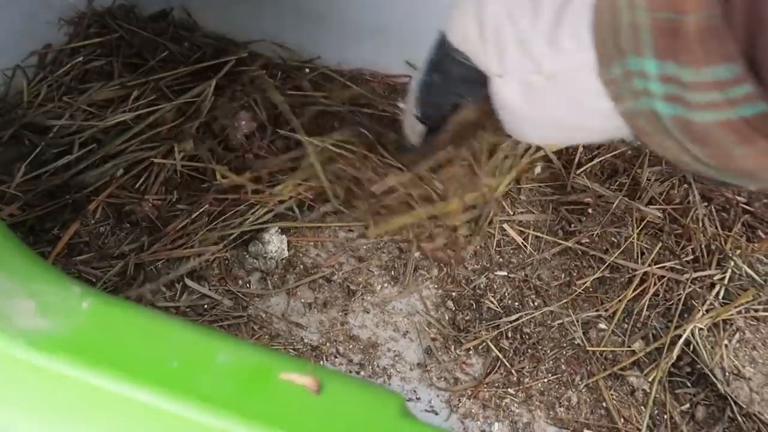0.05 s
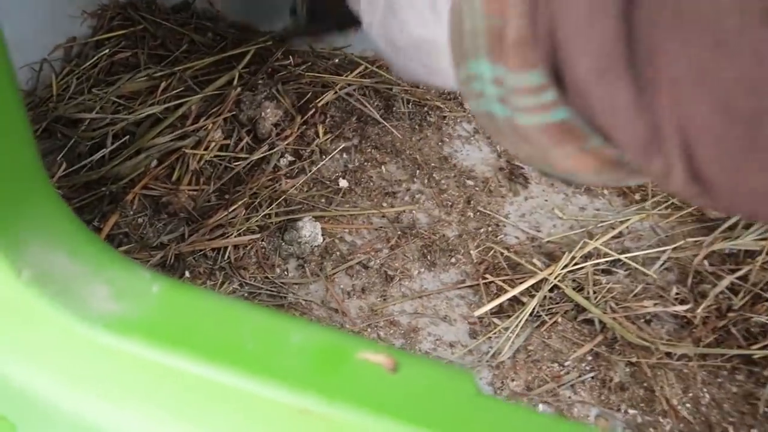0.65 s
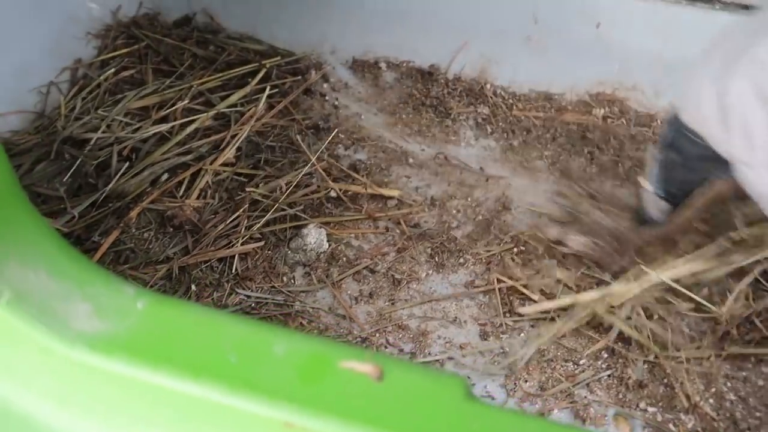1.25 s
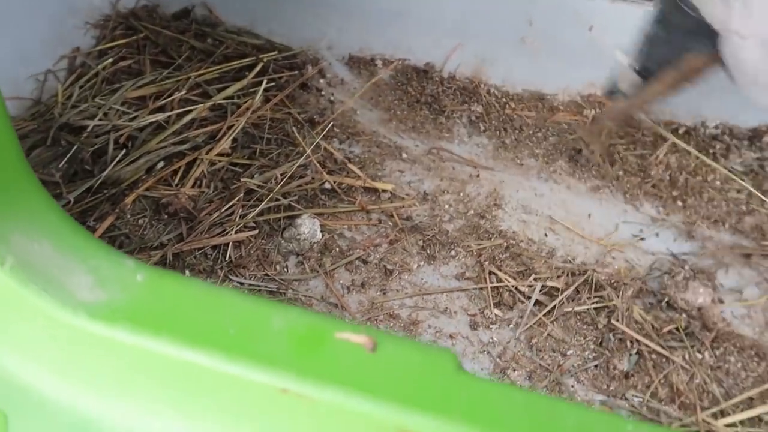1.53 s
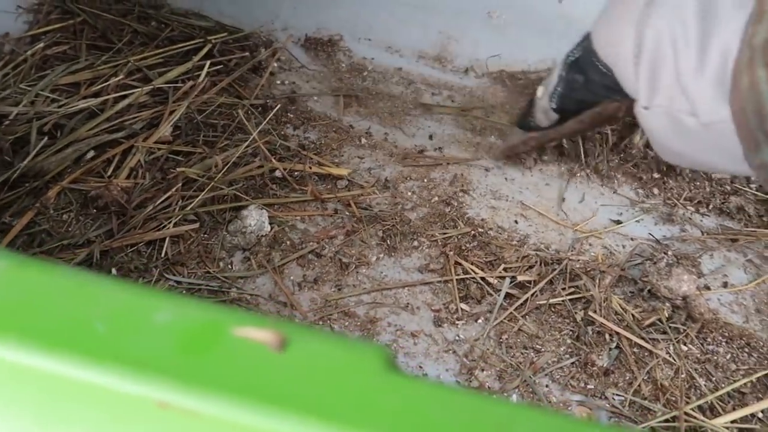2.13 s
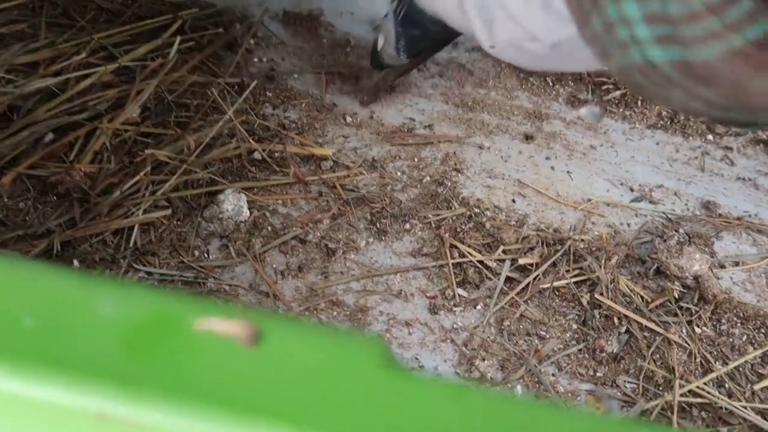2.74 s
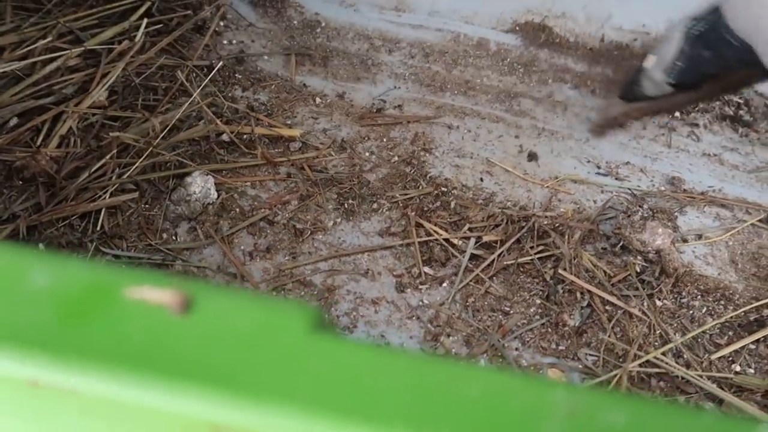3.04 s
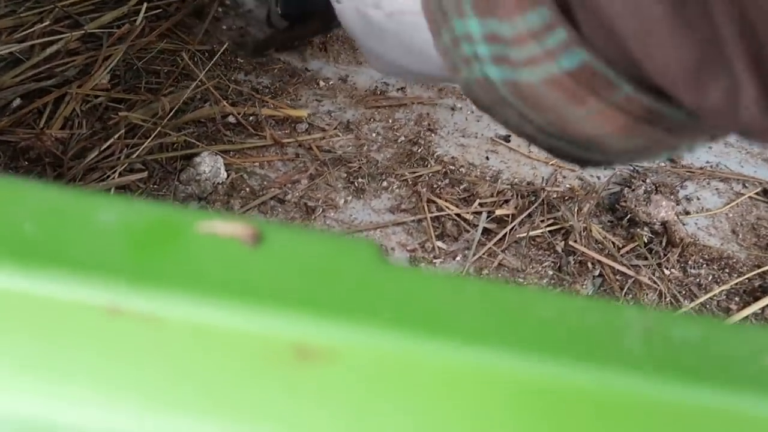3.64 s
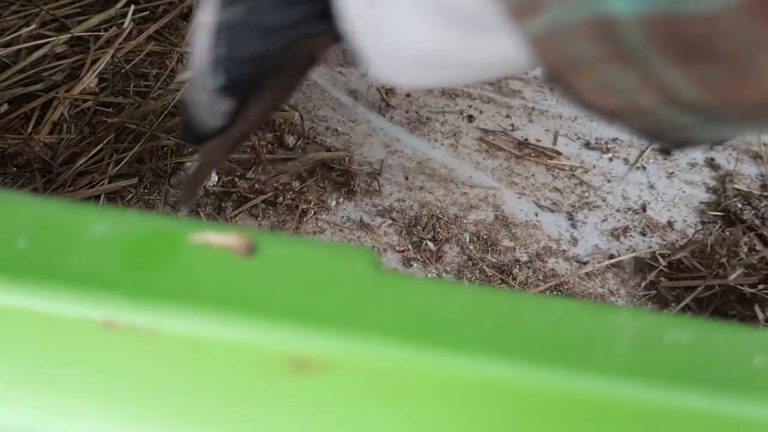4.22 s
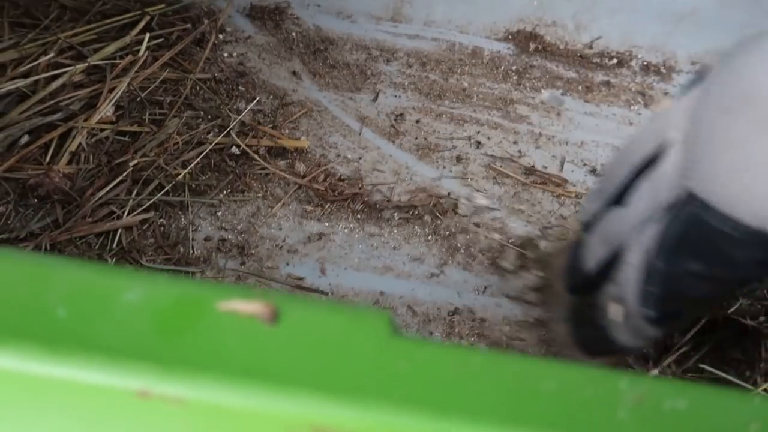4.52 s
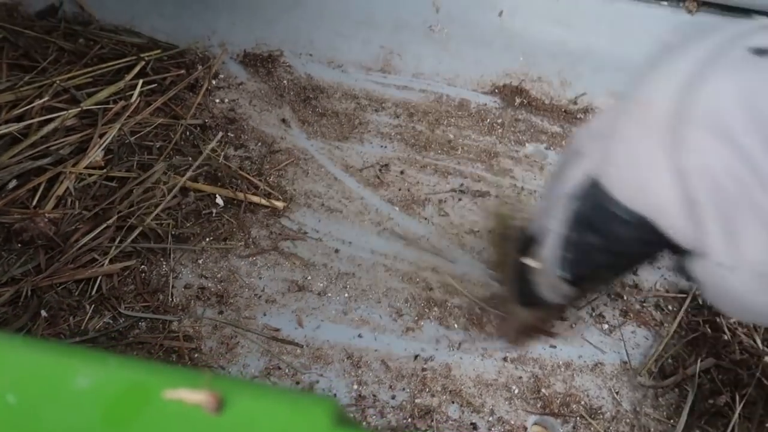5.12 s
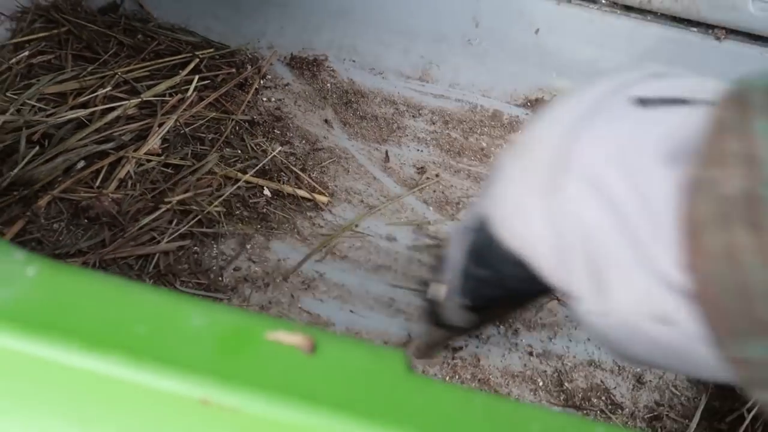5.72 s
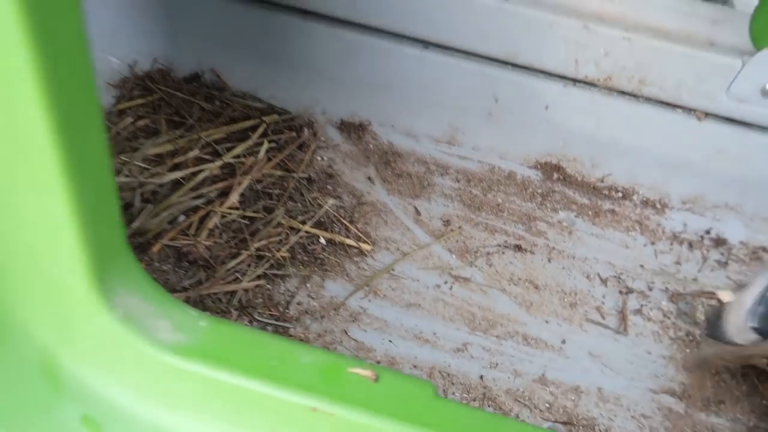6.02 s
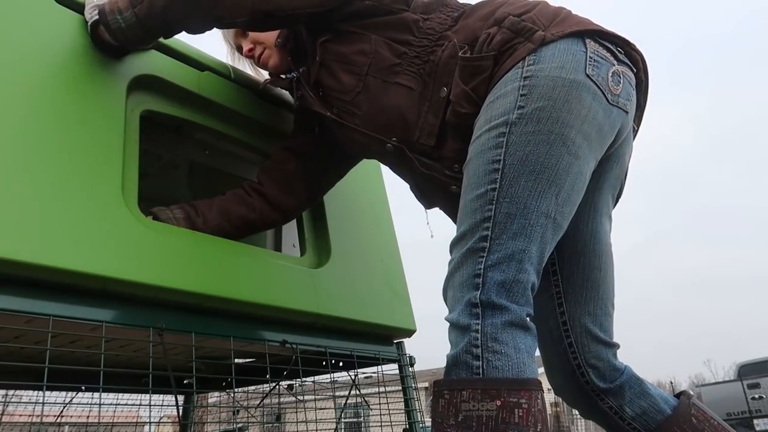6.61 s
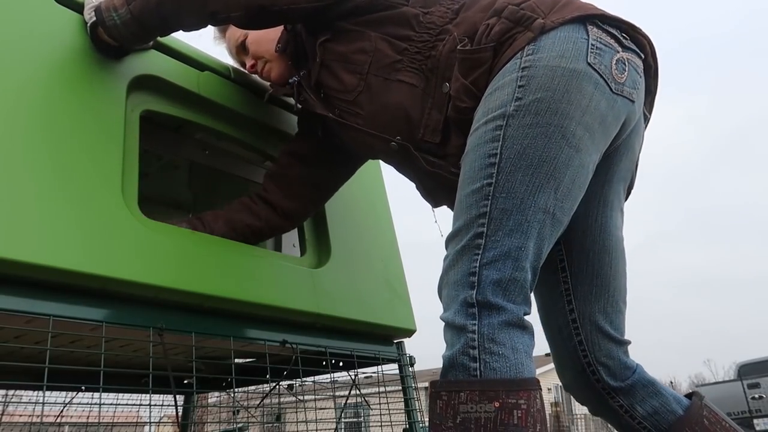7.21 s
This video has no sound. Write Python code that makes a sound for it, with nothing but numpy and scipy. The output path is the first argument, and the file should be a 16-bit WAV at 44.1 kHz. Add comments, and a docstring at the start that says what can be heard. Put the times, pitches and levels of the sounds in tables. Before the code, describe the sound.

Close, gritty scrapes come in a steady run as a blade pushes old straw bedding across the floor of a plastic coop. The hollow shell drums under each stroke and thumps when the blade hits the wall, while loose straw rustles in the gaps. Past the middle, a faint rooster and a few thin bird chirps sound in the quiet outdoor air. The scraping turns softer near the end.

```python
"""A hand scraper rasps through old straw bedding in a plastic chicken coop, stroke after stroke.
The blade bites, speeds up, then slows and digs into the heap it pushes; between strokes it knocks
and bounces on the hollow wall. Stick-slip friction makes the hiss and sets the shell drumming.
Loose straw rustles in the gaps and an arm bumps the rim; far off, a small bird chirps and a
rooster crows."""
import sys
import numpy as np
from scipy import signal
from scipy.fft import rfft, irfft
from scipy.io import wavfile
from scipy.ndimage import uniform_filter1d

SR = 44100
rng = np.random.default_rng(int(sys.argv[2]) if len(sys.argv) > 2 else 0)


def int16_out(signal):
    """Quantize to a 16-bit WAV file."""
    q = np.round(np.clip(np.atleast_2d(signal).T, -1, 1) * 32767)
    wavfile.write(sys.argv[1], SR, q.astype(np.int16))


N = 324576
TIME = np.arange(N) / SR
CONTROL_TIME = TIME[::64]  # coarse clock for the level envelopes


def amp(db):
    """Decibels to gain."""
    return 10 ** (np.asarray(db) / 20)


def unit(x):
    """Scales to rms 1."""
    return x / np.sqrt(np.mean(x ** 2) + 1e-20)


def eq_gain(curve, size):
    """Gain per FFT bin of an EQ curve drawn on a log-frequency axis."""
    hz, db = np.transpose(curve)
    return amp(np.interp(np.log(np.fft.rfftfreq(size, 1 / SR) + 1), np.log(hz), db))


def colour(x, curve):
    """Filters by an EQ curve, at unit gain for white noise."""
    size = x.shape[-1]
    return irfft(rfft(x) * unit(eq_gain(curve, size)), size)


def add(mix, s, sound):
    """Mixes a sound in at time s."""
    part = mix[..., round(s * SR):][..., :sound.shape[-1]]
    part += sound[..., :part.shape[-1]]


def wander(rate_hz):
    """Smooth random modulation of rms 1."""
    hz = np.fft.rfftfreq(N, 1 / SR)
    return unit(irfft(rfft(rng.standard_normal(N)) / (1 + (hz / rate_hz) ** 4), N))


def per_sample(control):
    """Spreads a slow envelope over all samples."""
    return np.interp(TIME, CONTROL_TIME, control)


def held(start, length, rise_db_per_s, fall_db_per_s):
    """Attack, hold and release in dB: 0 while held, falling away on both sides."""
    before, after = np.maximum(start - CONTROL_TIME, 0), np.maximum(CONTROL_TIME - start - length, 0)
    return -rise_db_per_s * before - fall_db_per_s * after


def hump(s, half_s):
    """A smooth rise to 1 and back around time s."""
    return np.exp(-((CONTROL_TIME - s) / half_s) ** 2)


# EQ of the outdoor bed: f/Hz, level/dB
AIR_EQ = [(30, -13.5), (150, 2.5), (500, -13.5), (2000, -16.5), (7000, -30), (15000, -47)]


def air():
    """Quiet outdoor air: a soft bed of low noise."""
    return amp(-55) * colour(rng.standard_normal((2, N)), AIR_EQ)


def rooster(start_s=4.78, length_s=0.9, db=-48.5, start_hz=1600, end_hz=1510):
    """One partial of a far crow carries: it grows hoarse, sags at its end and flickers in the open air."""
    out, u = np.zeros(N), np.linspace(0, 1, round(length_s * SR))
    hoarseness = 1 + 0.026 * u * wander(rate_hz=140)[:len(u)]
    hz = (start_hz + (end_hz - start_hz) * u ** 3) * hoarseness
    level = amp(db - 2 * u + 3 * wander(rate_hz=31)[:len(u)])
    fade = np.minimum(10 * np.minimum(u, 1 - u), 1)
    add(out, start_s, level * fade * np.sin(2 * np.pi * np.cumsum(hz) / SR))
    return out


# chirps of a small bird: t/s, length/s, start f/Hz, end f/Hz, level/dB
BIRD_CHIRPS = [(4.877, 0.032, 4010, 4800, -41), (5.5, 0.049, 4450, 4920, -46.5),
               (6.793, 0.052, 9000, 7300, -33)]


def bird():
    """Thin notes that glide quickly and then level off, with a faint scatter from the yard."""
    out = np.zeros(N)
    for s, length, start_hz, end_hz, db in BIRD_CHIRPS:
        u = np.linspace(0, 1, round(length * SR))
        glide = end_hz + (start_hz - end_hz) * (1 - u) ** 1.9
        hz = glide * (1 + 0.014 * wander(rate_hz=640)[:len(u)])
        add(out, s, amp(db) * np.sin(np.pi * u) * np.sin(2 * np.pi * np.cumsum(hz) / SR))
    yard = rng.standard_normal(SR) * amp(-60 * TIME[:SR] / 0.32)
    return out + amp(-16) * signal.oaconvolve(out, yard / np.linalg.norm(yard))[:N]


# the sleeve bumps and slides on the rim: t/s, length/s, level/dB
SLEEVE_BUMPS = [(0.545, 0.017, -34.5), (1.096, 0.15, -32), (1.5, 0.4, -38), (5.065, 0.02, -21.5),
                (5.738, 0.044, -29.5), (7.332, 0.032, -33)]
# EQ of the arm's dull rumble: f/Hz, level/dB
ARM_EQ = [(28, -39), (42, -2), (58, -12), (100, 3), (160, -2.5), (260, -4), (500, -55)]


def arm():
    """The arm weighs on the rim most when the blade is fastest, and bumps it in between."""
    leans = [db + held(bite + fastest * length, 0, rise_db_per_s=65, fall_db_per_s=54)
             for bite, length, fastest, *_, db in BLADE_STROKES]
    bumps = [db + held(s, length, rise_db_per_s=192, fall_db_per_s=54) for s, length, db in SLEEVE_BUMPS]
    return colour(rng.standard_normal((2, N)), ARM_EQ) * amp(per_sample(np.max(leans + bumps, axis=0)))


# modes of the hollow plastic shell: f/Hz, level/dB, undamped t60/s
SHELL_MODES = [(112.7, -25.5, 0.37), (130.4, -5.5, 0.21), (209, -5, 0.3), (240.9, -3.5, 0.2),
               (298, -8.5, 0.18), (356.7, -2, 0.13), (383.3, -2.5, 0.12), (497.7, -9.5, 0.11),
               (618, -16, 0.14), (681, -3, 0.086), (748, -4.5, 0.077), (891, -1.5, 0.071), (948, 0, 0.039),
               (1707, -2.5, 0.032)]
MODE_HZ = np.transpose(SHELL_MODES)[0]


def shell_ring(weights, detune):
    """The shell's answer to one push, with a weight and a tuning factor for each mode."""
    hz, db, t60 = np.transpose(SHELL_MODES)
    t = TIME[:SR // 2, None]
    return (amp(db - 60 * t / t60) * np.sin(2 * np.pi * hz * detune * t)) @ weights


def damped_shell(drive, low_hz, high_hz, detune, decay_s, tilt_db=0):
    """Plays a drive through a band of the shell's modes, choked by the pressing hand."""
    polarity = (-1) ** np.arange(len(MODE_HZ))
    band = 1 / (1 + (low_hz / MODE_HZ) ** 4) / (1 + (MODE_HZ / high_hz) ** 4)
    ring = shell_ring(polarity * band * amp(tilt_db * np.log2(MODE_HZ)), detune)
    ring *= np.exp(-TIME[:len(ring)] / decay_s)
    return unit(signal.oaconvolve(drive, ring[None])[:, :drive.shape[-1]])


def drumming():
    """The harder the blade rasps, the more the low modes of the shell drum."""
    hiss_db, rasp_db, _ = rubbing()
    judder = friction(per_s=600, spread_db=2.5, grain_share=0.34, patchy_db=2)
    wall = damped_shell(judder, low_hz=160, high_hz=450, detune=0.96, decay_s=0.0072)
    return wall * amp(0.76 * (hiss_db + rasp_db) - 9.5)


# the blade bears down on the floor: t/s, length/s, level/dB, tilt/(dB per octave)
FLOOR_PRESSES = [(0.041, 0.16, -30.5, -5), (0.155, 0.051, -18.5, -2.5), (0.216, 0.13, -23, 0.5),
                 (4.475, 0.04, -25.5, -13.5), (4.645, 0.13, -26.5, 1.5), (5.269, 0.04, -31, -4.5),
                 (6.681, 0.06, -34, -2)]


def pressing(fade_s=0.03):
    """Where the blade bears down, its dense chatter sounds the hollow shell."""
    out = np.zeros((2, N))
    for start, length, db, tilt_db in FLOOR_PRESSES:
        t = TIME[:round((length + 2 * fade_s) * SR)]
        grip = np.clip(np.minimum(t, t[-1] - t) / fade_s, 0, 1) ** 2
        chatter = rng.standard_normal((2, len(t)))
        body = damped_shell(chatter, low_hz=190, high_hz=1700, detune=0.94, decay_s=0.0053, tilt_db=tilt_db)
        add(out, max(start - fade_s, 0), amp(db) * grip * body)
    return out


def burst(eq, rise, t60, tail_db, tail_t60):
    """The noise of an impact and its short rattle round the compartment; times in seconds."""
    t = TIME[:SR // 3]
    envelope = (1 - np.exp(-t / rise)) * (amp(-60 * t / t60) + amp(tail_db - 60 * t / tail_t60))
    return colour(rng.standard_normal((2, len(t))), eq) * envelope


# the blade catches on caked dirt or taps lightly: t/s, level/dB, centre f/Hz, t60/s
BLADE_CATCHES = [(0.7961, -17.5, 4200, 0.034), (1.436, -18, 1680, 0.079), (4.888, -25.5, 990, 0.087),
                 (5.067, -18.5, 1590, 0.16), (6.2125, -30.5, 2270, 0.017), (6.728, -19, 890, 0.088)]


def catches():
    """Short gritty bursts where the blade breaks through or touches down."""
    out = np.zeros((2, N))
    for s, db, hz, t60 in BLADE_CATCHES:
        band = [(hz / 4, -22), (hz, 0), (hz * 2, -9), (hz * 6, -42)]
        add(out, s, amp(db) * burst(band, rise=0.059 * t60, t60=t60, tail_db=-22, tail_t60=0.05))
    return out


# blows on the wall: t/s, body trim/dB, push centre f/Hz, spot on the panel/0-1, crack trim/dB
WALL_KNOCKS = [(0.762, -2.5, 318, 0.55, -29.5), (0.778, -1, 720, 0.17, -42), (0.7965, -18, 764, 0.36, -53),
               (0.799, -5, 280, 0.94, -57), (1.903, 2.5, 418, 0.56, -20), (2.8466, 0, 706, 0.45, -24),
               (2.85, -1.5, 202, 0.5, -39), (3.7043, -1.5, 403, 0.79, -28), (4.389, -9, 183, 0.49, -33),
               (4.498, -8, 180, 0.2, -43), (5.0162, -2, 127, 0.69, -33.5), (5.681, 3, 163, 0.43, -28),
               (6.311, -18, 850, 0.18, -26.5), (6.3218, -4, 310, 0.78, -28.5),
               (7.1198, -0.5, 484, 0.18, -25)]
# EQ of the crack of blade on plastic: f/Hz, level/dB
CRACK_EQ = [(150, -2.5), (600, 7), (1200, -2.5), (2500, -12.5), (4800, -25), (8000, -35.5), (15000, -61)]


def knocks(cushioned_db=32.5, focus_db=4):
    """A blow favours the modes near the centre of its push; the spot struck weights and detunes them."""
    out, t = np.zeros((2, N)), TIME[:SR // 2]
    for s, db, push_hz, spot, crack_db in WALL_KNOCKS:
        # a blow cushioned by bedding hardly cracks and keeps closer to its centre
        focus = 1.5 + max(db - crack_db - cushioned_db, 0) / focus_db
        push = 1 / np.sqrt(1 + 0.97 * (MODE_HZ / push_hz - push_hz / MODE_HZ) ** 2) ** focus
        place = np.pi * spot * np.arange(len(MODE_HZ))
        ring = shell_ring(push * (1 + 0.5 * np.cos(place)), detune=1 + 0.032 * np.sin(2 * place))
        ring *= 1 - np.exp(-t / 0.0052)
        # the wall first gives way in one or two heavy swings
        cycles = t * push_hz
        swing = np.sin(2 * np.pi * cycles) * cycles * np.exp(-cycles / 0.72)
        add(out[0], s, amp(db) * (amp(-4) * ring + amp(6.5) * swing))
        # loose panels and bedding rattle in a dense thud around the same pitch
        thud = [(push_hz / 4, -26), (push_hz / 2, 0), (push_hz * 0.87, -5),
                (push_hz * 4, -32), (push_hz * 10, -65)]
        add(out, s, amp(db - 17) * burst(thud, rise=0.0015, t60=0.092, tail_db=1.5, tail_t60=0.16))
        crack = burst(CRACK_EQ, rise=0.00063, t60=0.071, tail_db=-9, tail_t60=0.11)
        add(out, s, amp(crack_db + 6.5) * crack)
    return out


# loose straw between strokes: t/s, length/s, hiss level/dB
STRAW_RUSTLES = [(0.409, 0.12, -43), (0.542, 0.29, -55.5), (1.488, 0.088, -51), (1.62, 0.24, -60),
                 (2.528, 0.055, -55.5), (2.657, 0.17, -56.5), (4.15, 0.36, -65.5), (4.79, 0.51, -54),
                 (5.44, 0.23, -55.5), (6.018, 0.075, -54.5), (6.126, 0.26, -59.5), (6.853, 0.26, -63.5)]


def rustles():
    """Straw falls and is brushed: yields hiss, rasp and fizz envelopes in dB for each rustle."""
    for start, length, db in STRAW_RUSTLES:
        hiss = db + held(start, length, rise_db_per_s=255, fall_db_per_s=255)
        yield hiss, hiss + 4.5, hiss - 10


# strokes of the blade: bite t/s, length/s, fastest point/0-1, hiss level there/dB, swell up to it/dB,
# rasp re hiss/dB, closing dig/dB, fizz re hiss/dB, arm level/dB
BLADE_STROKES = [(0.008, 0.38, 0.51, -25.5, 9, -1.5, 3.5, -9, -38),
                 (0.898, 0.577, 0.64, -31.5, 12, -1, 1.5, -10.5, -35),
                 (1.973, 0.54, 0.91, -34.5, 8.5, 1, 4.5, -11.5, -39),
                 (2.907, 0.44, 0.78, -33.5, 11, 0, -3.5, -9.5, -45.5),
                 (3.762, 0.35, 0.59, -32.5, 7.5, 0.5, 3, -10, -33),
                 (4.465, 0.29, 0.73, -27, 6.5, 0, 2, -9, -26.5),
                 (5.088, 0.297, 0.39, -24.5, 4.5, -2, -0.5, -9.5, -22.5),
                 (5.734, 0.28, 0.61, -38.5, 1, 0.5, 13, -9, -32),
                 (6.416, 0.43, 0.64, -43, 10, 4, -2.5, -12.5, -34),
                 (7.174, 0.21, 0.94, -47.5, 11, 5.5, 9.5, -12.5, -34.5)]


def strokes(sag_db=4.5, dig_s=0.028):
    """The blade brightens with speed, slows, dulls and digs in: yields hiss, rasp and fizz in dB."""
    for bite, length, fastest, db, swell_db, rasp_db, dig_db, fizz_db, _ in BLADE_STROKES:
        travel = (CONTROL_TIME - bite) / length
        starting = np.clip(1 - travel / fastest, 0, 1)
        slowing = np.clip((travel - fastest) / (1 - fastest), 0, 1)
        dig = dig_db * hump(bite + length - dig_s, dig_s)  # just before the lift
        contact = held(bite, length, rise_db_per_s=801.5, fall_db_per_s=536)
        level = db - swell_db * starting - sag_db * slowing + contact
        hiss = level + 0.82 * dig
        rasp = level + rasp_db + 2 * starting + 5.5 * slowing + dig  # a slow blade rasps more
        yield hiss, rasp, hiss + fizz_db - 1.5 * slowing


# dry grit under the blade: t/s, half length/s, hiss boost/dB, rasp boost/dB
GRIT_PATCHES = [(2.113, 0.083, 6, 8), (2.405, 0.043, 7.5, 2.5), (3.036, 0.041, 3.5, 4.5),
                (6.714, 0.072, 1.5, 6)]


def rubbing():
    """The loudest stroke or rustle leads, lifted by grit: hiss in dB, and rasp and fizz relative to it."""
    hiss, rasp, fizz = np.max([*strokes(), *rustles()], axis=0)
    rasp, fizz = rasp - hiss, fizz - hiss
    for s, half_s, hiss_db, rasp_db in GRIT_PATCHES:
        hiss += hiss_db * hump(s, half_s)
        rasp += (rasp_db - hiss_db) * hump(s, half_s)
    return per_sample(hiss), per_sample(rasp), per_sample(fizz)


def friction(per_s, spread_db, grain_share, patchy_db):
    """Snapping grains over fine rubbing; passing stalks and clods lend it brief resonances."""
    sizes = amp(spread_db * np.minimum(rng.exponential(1, N), 5))
    snaps = rng.random(N) < per_s / SR
    grains = unit(sizes * snaps * rng.choice([-1, 1], (2, N)))
    drive = np.sqrt(grain_share) * grains + np.sqrt(1 - grain_share) * rng.standard_normal((2, N))
    frames = signal.stft(drive, nperseg=1024)[2]
    patches = rng.standard_normal(frames.shape[1:])
    for axis in (0, 1):  # smooth over frequency, then time
        patches = uniform_filter1d(patches, size=4, axis=axis)
    return unit(signal.istft(frames * amp(patchy_db * unit(patches)))[1][:, :N])


def blade_ring(x, hz, width_hz):
    """A gliding resonance: the curve hz is shifted to zero, smoothed twice, and shifted back."""
    carrier = np.exp(2j * np.pi * np.cumsum(hz) / SR)
    pole = np.exp(-np.pi * width_hz / SR)
    return unit((carrier * signal.lfilter([1], [1, -2 * pole, pole * pole], x / carrier)).real)


# EQs of the scrape's coarse body, bright middle and dry top: f/Hz, level/dB
RASP_EQ = [(250, -14), (500, 0.5), (950, 2), (1200, -9), (1600, -4.5), (2100, -11), (3500, -55.5)]
HISS_EQ = [(900, -63), (1600, -5.5), (2300, 2.5), (4200, 0.5), (4800, -1), (5600, -4.5), (8000, -28.5)]
FIZZ_EQ = [(4500, -28.5), (6200, -1.5), (7600, -6), (10500, -8.5), (13000, -14.5), (15500, -41)]


def scraping():
    """The blade sticks and slips; rasp, hiss and the fizz of dry straw judder together."""
    hiss_db, rasp_db, fizz_db = rubbing()
    rasp = colour(friction(per_s=900, spread_db=2, grain_share=0.33, patchy_db=4), RASP_EQ)
    hiss = colour(friction(per_s=1300, spread_db=-0.5, grain_share=0.26, patchy_db=3.5), HISS_EQ)
    fizz = colour(friction(per_s=5600, spread_db=1.5, grain_share=0.18, patchy_db=4.5), FIZZ_EQ)
    # pressed hard, the edge grates with a hollow note that slides as the grip changes
    grate = blade_ring(rng.standard_normal((2, N)), 1400 * np.exp(0.14 * wander(rate_hz=12)), width_hz=430)
    grate_db = 1.43 * rasp_db + 0.19 * hiss_db - 4.5
    blend = rasp * amp(rasp_db - 1.5) + hiss * amp(-0.54) + fizz * amp(fizz_db) + grate * amp(grate_db)
    return blend * amp(hiss_db + 0.21 * wander(rate_hz=50))


# stereo width: f/Hz, side re mid/dB
WIDTH_EQ = [(100, -49), (500, -28.5), (1400, -17), (2800, -12), (5600, -2.5), (9000, 1), (14000, 2.5)]


def stereo(pair):
    """Two signals become mid and side: bass is mono, treble wide."""
    side = irfft(rfft(pair[1]) * eq_gain(WIDTH_EQ, N), N)
    return np.array([pair[0] + side, pair[0] - side])


def scene():
    """Air and coop spread in stereo, with the far birds in the centre."""
    coop = air() + scraping() + pressing() + drumming() + arm() + knocks() + catches()
    return stereo(coop) + bird() + rooster()


def record(dry):
    """The microphone moves aside late on, so the right side lags; hard knocks clip; the top is cut."""
    move_s, cutoff_hz = 6.14, 15200
    right = np.where(TIME > move_s, np.roll(dry[1], 2), dry[1])
    clipped = np.clip([dry[0], right], -1, 1)
    lowpass = signal.firwin(511, cutoff_hz, window=("kaiser", 9), fs=SR)
    return signal.oaconvolve(clipped, lowpass[None], "same")


dry = scene()
out = record(dry)
int16_out(out)
```